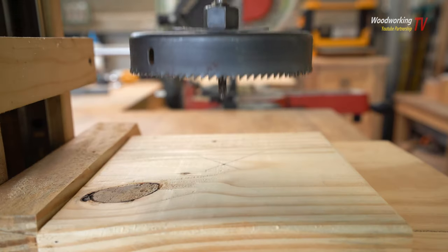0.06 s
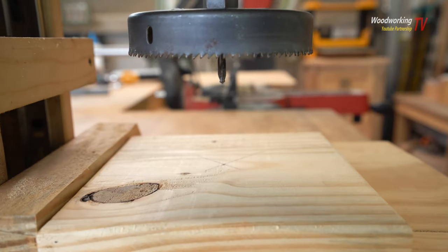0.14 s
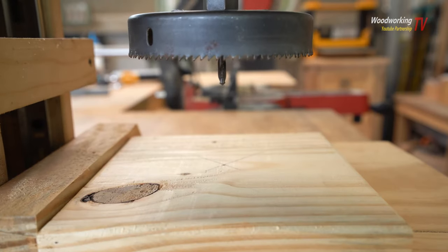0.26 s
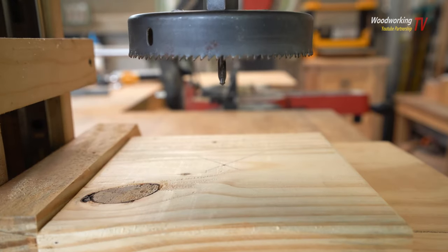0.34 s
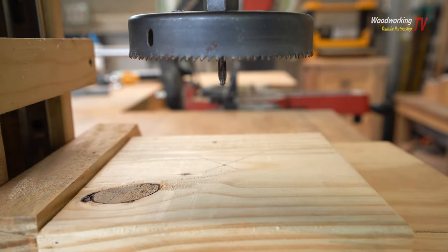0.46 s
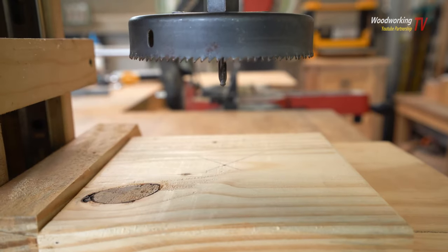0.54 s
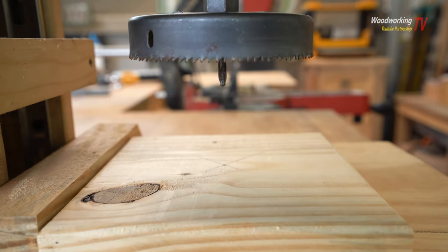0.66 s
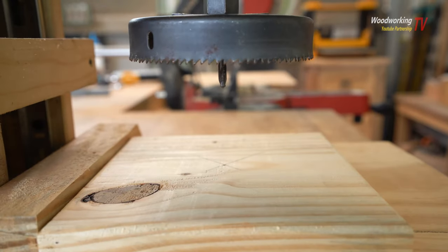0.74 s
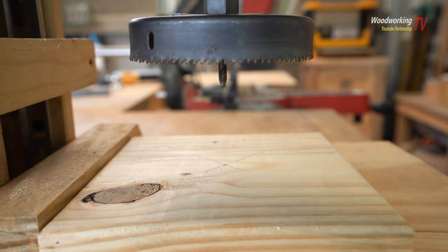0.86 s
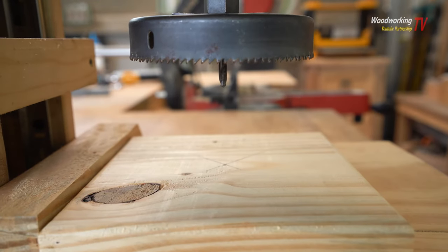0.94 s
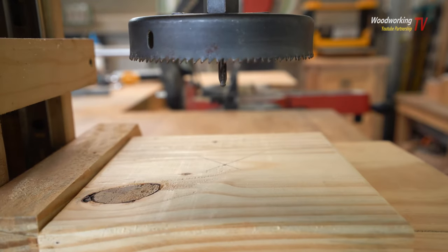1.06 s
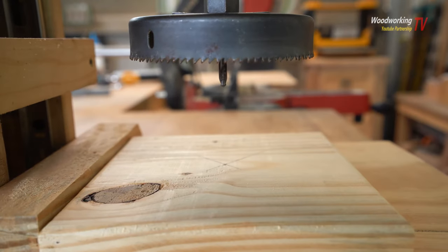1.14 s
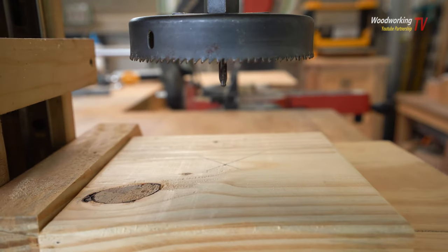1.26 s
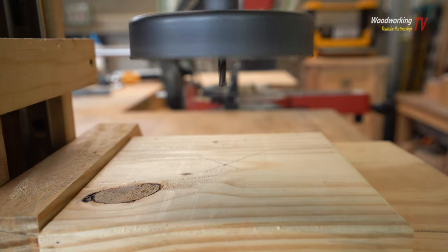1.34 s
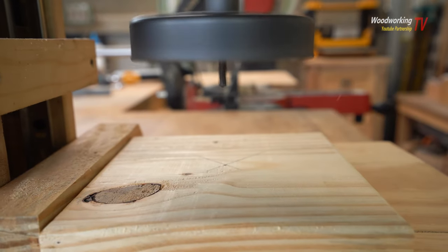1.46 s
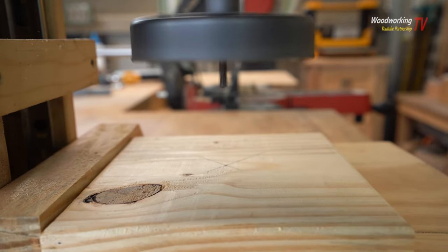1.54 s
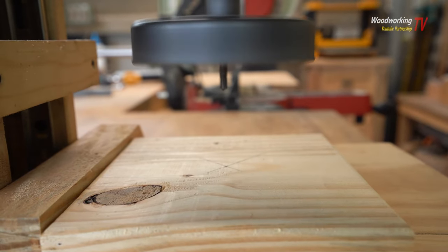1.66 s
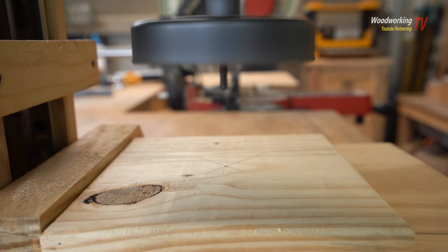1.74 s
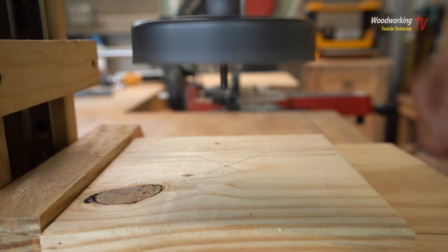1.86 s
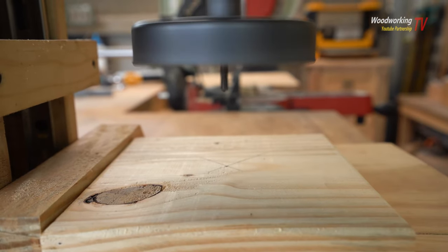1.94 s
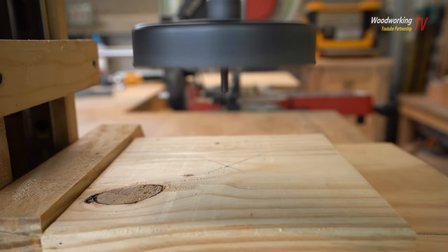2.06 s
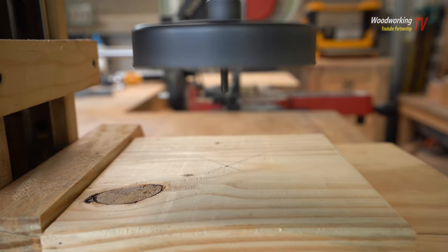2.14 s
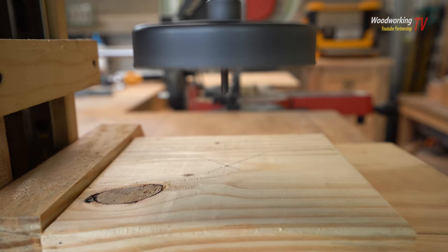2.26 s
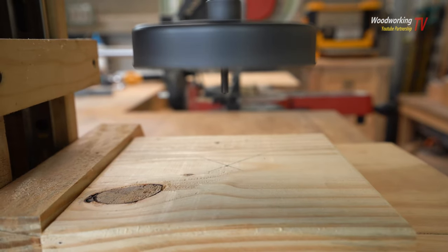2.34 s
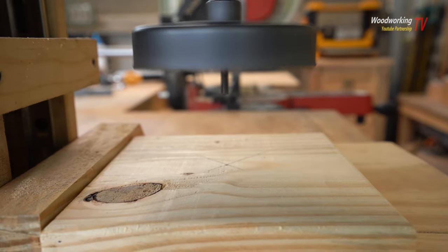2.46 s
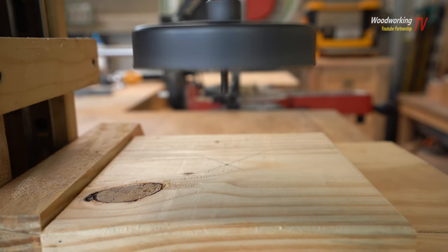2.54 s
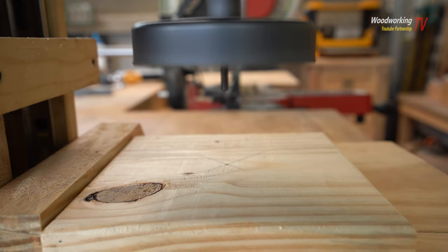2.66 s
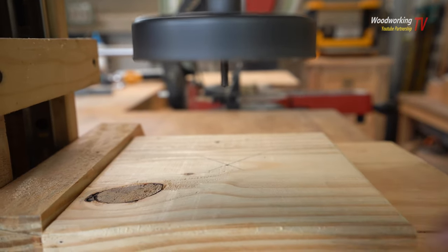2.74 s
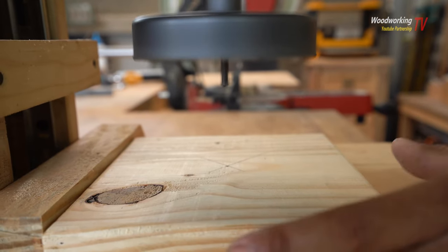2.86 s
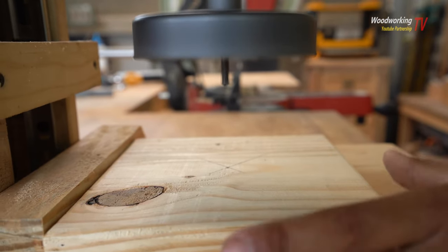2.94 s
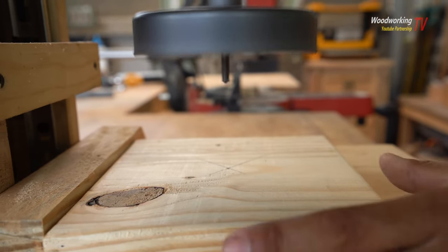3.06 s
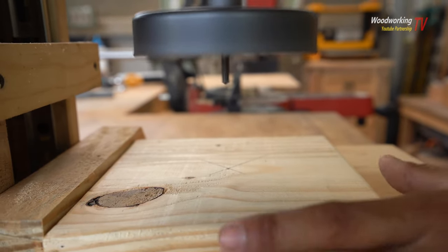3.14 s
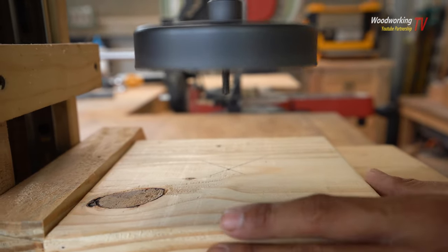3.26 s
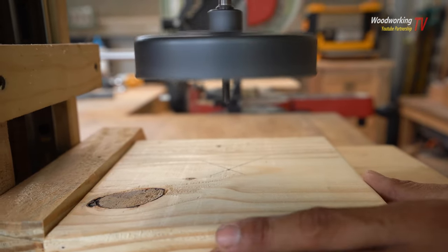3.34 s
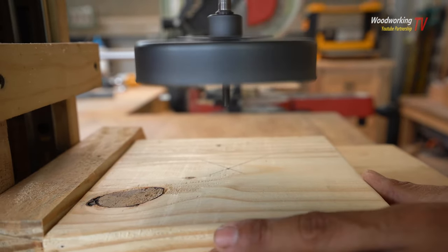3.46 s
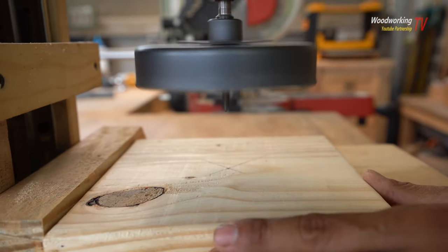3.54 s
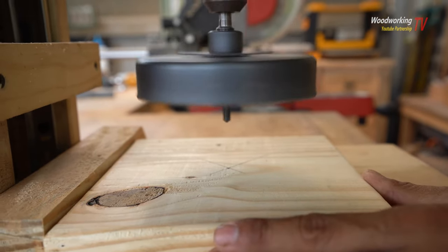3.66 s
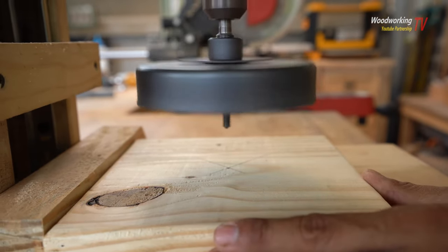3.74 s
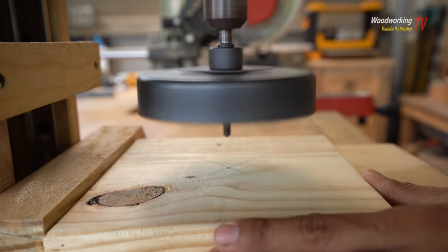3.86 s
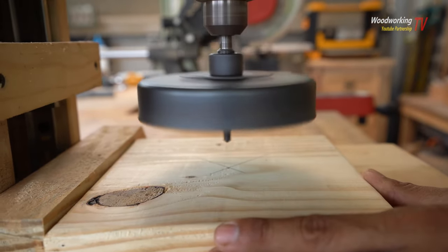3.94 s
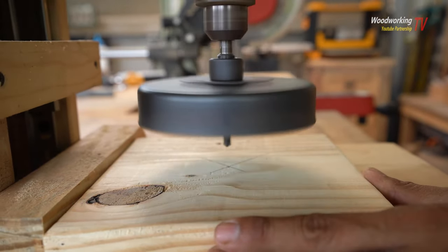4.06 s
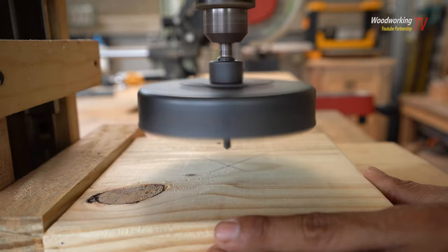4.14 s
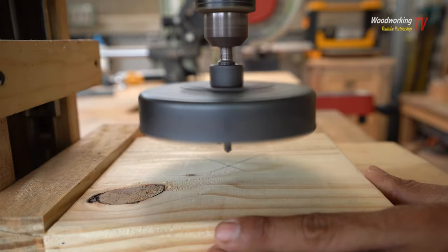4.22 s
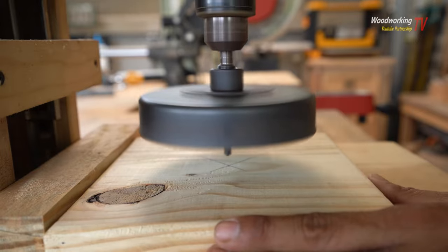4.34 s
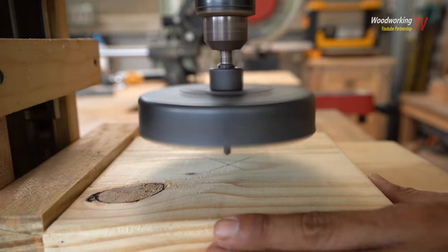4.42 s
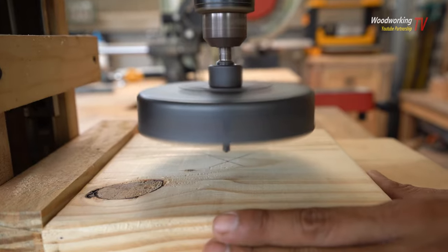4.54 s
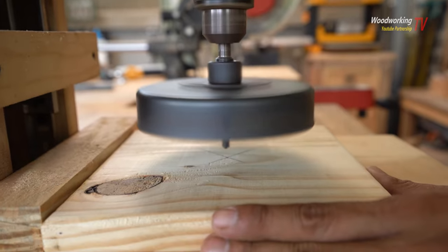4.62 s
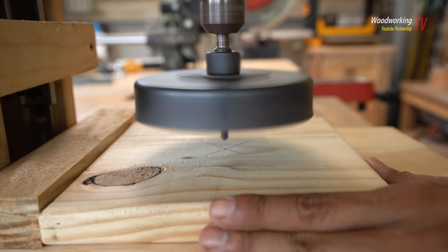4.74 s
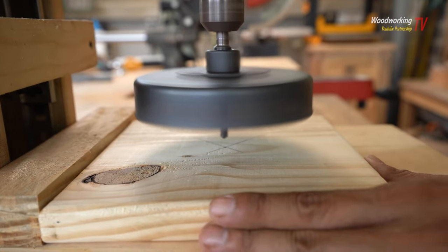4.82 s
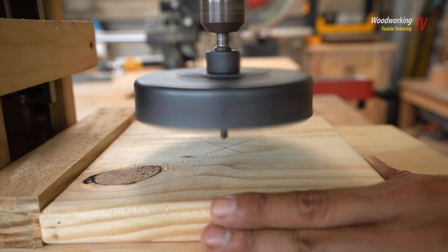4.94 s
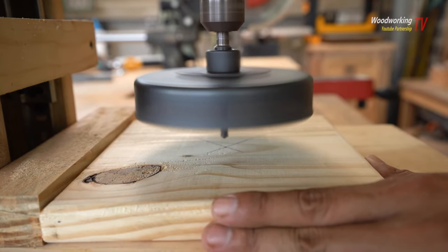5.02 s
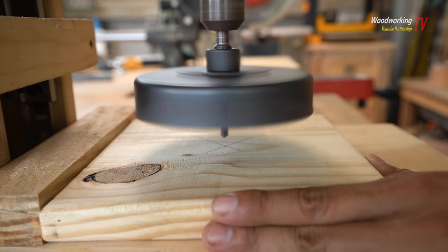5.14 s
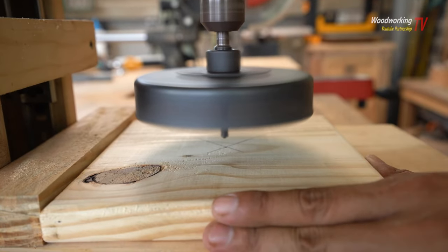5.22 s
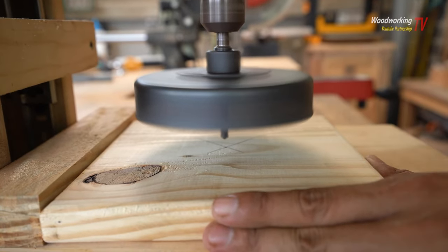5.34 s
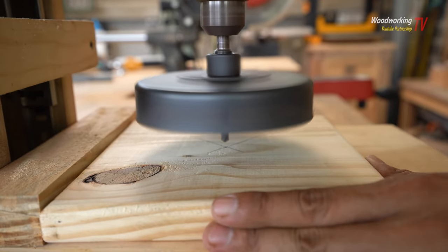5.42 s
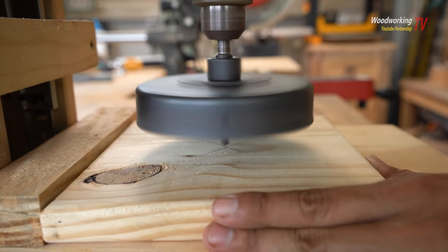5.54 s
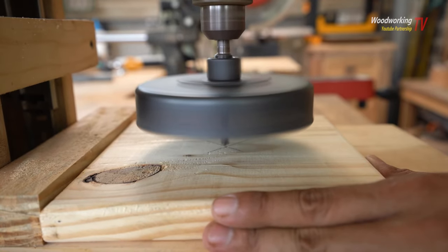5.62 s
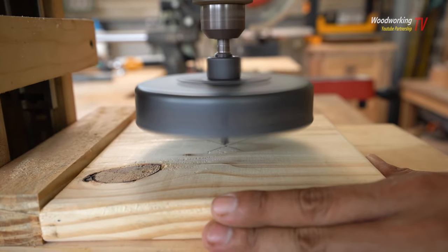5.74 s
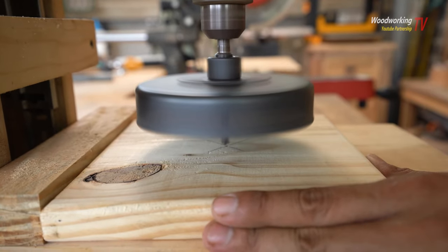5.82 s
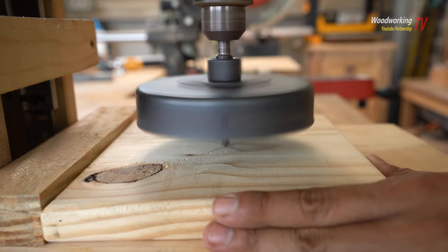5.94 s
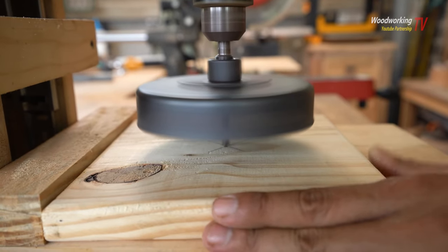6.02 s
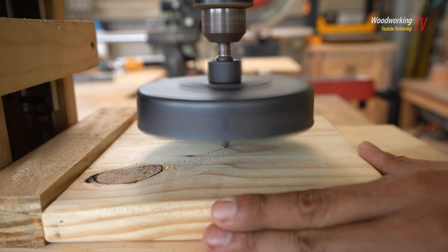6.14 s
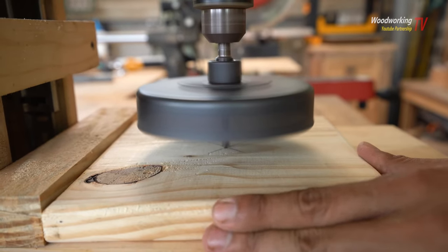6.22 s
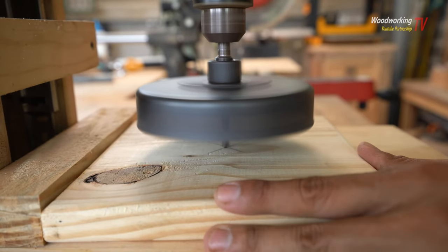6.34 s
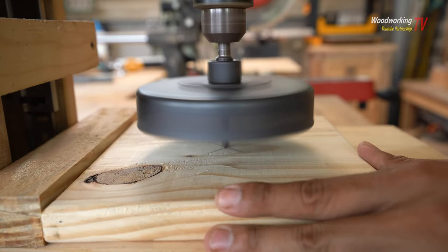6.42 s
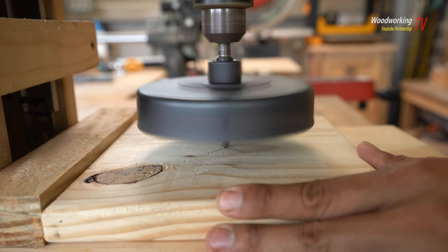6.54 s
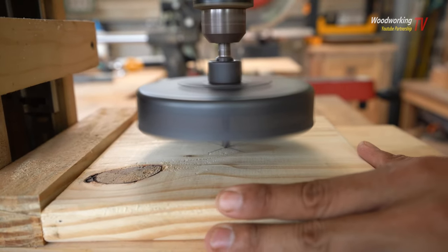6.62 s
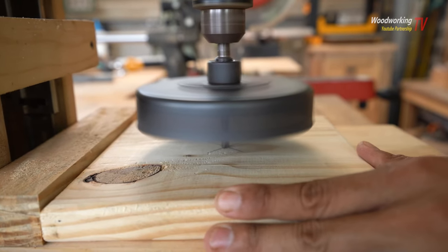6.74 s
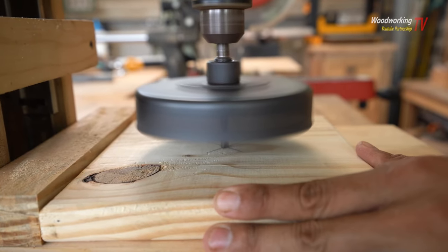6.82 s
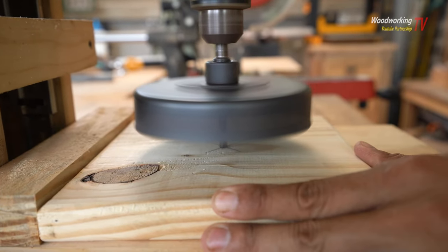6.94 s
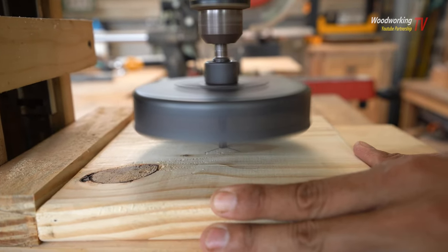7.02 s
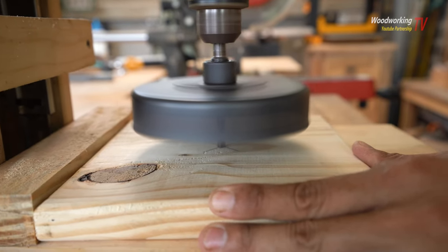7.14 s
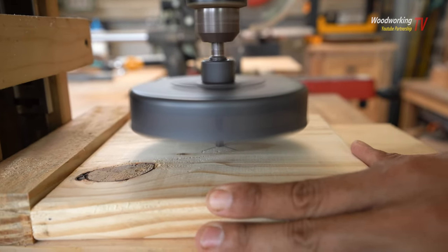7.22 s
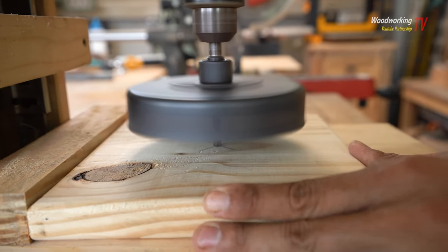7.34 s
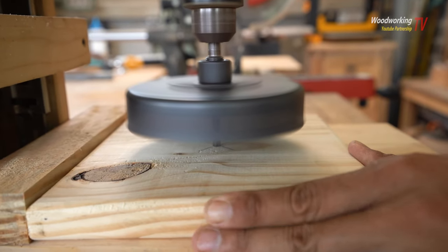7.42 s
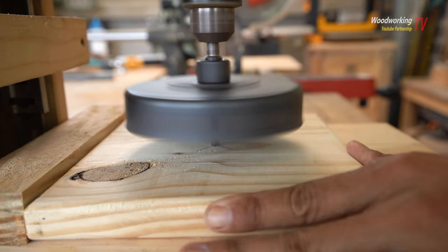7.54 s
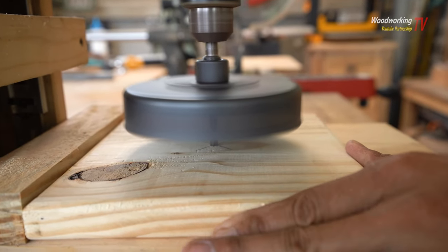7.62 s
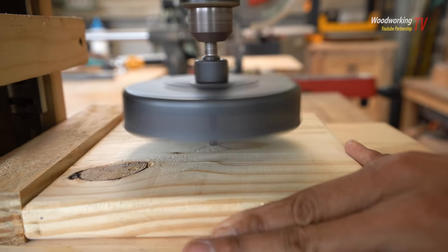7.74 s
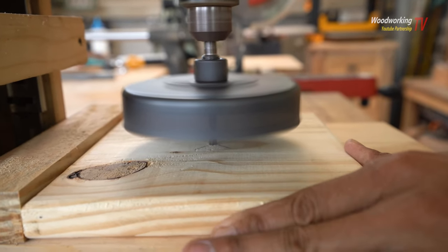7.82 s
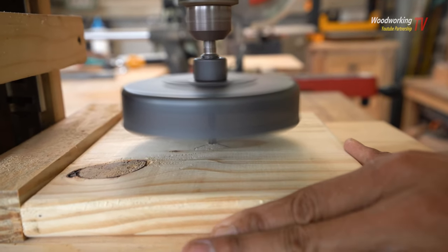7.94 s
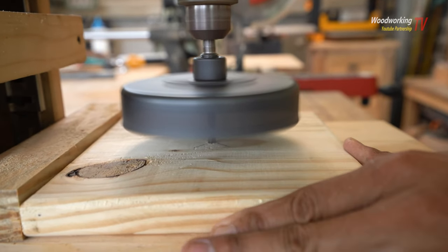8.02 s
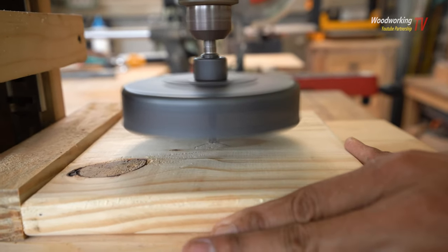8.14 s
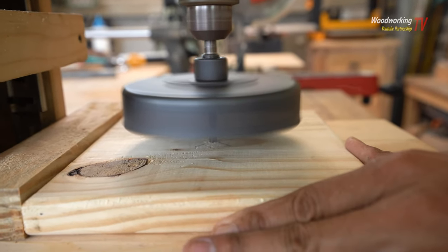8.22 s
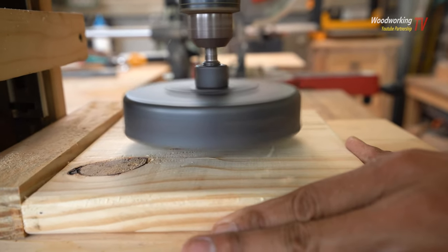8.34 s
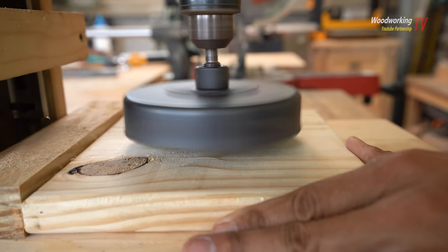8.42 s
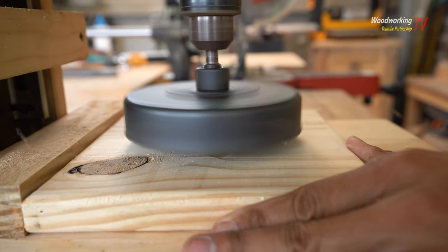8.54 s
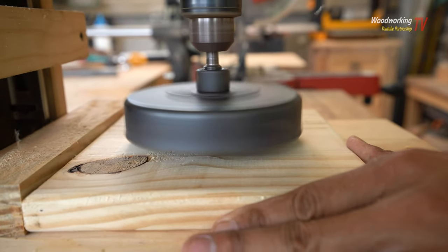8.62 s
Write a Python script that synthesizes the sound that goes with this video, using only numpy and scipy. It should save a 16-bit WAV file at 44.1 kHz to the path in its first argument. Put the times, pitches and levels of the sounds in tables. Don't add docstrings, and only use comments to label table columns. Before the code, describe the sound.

A lever clacks in a humming workshop, then a geared electric drill whines up, rattles loosely, and bores into wood with growling, straining, dropping pitch.

```python
import sys
import numpy as np
from scipy import signal
from scipy.fft import rfft, irfft, next_fast_len
from scipy.io import wavfile
from scipy.ndimage import map_coordinates

SR = 44100
rng = np.random.default_rng(int(sys.argv[2]) if len(sys.argv) > 2 else 0)


def store_wav(level_fs):
    pcm = np.round(np.clip(np.atleast_2d(level_fs), -1, 1) * 32767)
    wavfile.write(sys.argv[1], SR, pcm.T.astype(np.int16))


def gain_from_db(level_db):
    decades = np.asarray(level_db, float) / 20
    return 10 ** decades


N = 382347
TIME = np.arange(N) / SR

GEAR = 9.27
MESH, SLOTS, BARS = 4, 7, 12
TRIGGER_S, CONTACT_S = 1.335, 6.6
SEAT_S = 0.18
LOWERED_S = (3.67, 4.7)

# t/s, thump level/dB
TOUCH = [
    (5.98, -82),
    (6.03, -47),
    (6.08, -59),
    (6.3, -64),
    (6.6, -66),
]
# t/s, length/s, octave level/dB, steady share/1
SQUEALS = [
    (7.32, .14, -24.5, .6),
    (8.115, .17, -26, .2),
]


def unit(x):
    return x / np.sqrt(np.mean(x ** 2) + 1e-20)


def along(points, hz):
    f, v = np.transpose(points)
    return np.interp(np.log(hz + 1), np.log(f + 1), v)


def curves(rows):
    s, *cols = np.transpose(rows)
    return [np.interp(TIME, s, c) for c in cols]


def ramp(start_s, length_s):
    return np.clip((TIME - start_s) / length_s, 0, 1)


def bump(s, width_s):
    return np.exp(-((TIME - s) / width_s) ** 2)


def wobble(rate):
    return map_coordinates(rng.standard_normal(int(N * rate / SR) + 4), [TIME * rate])


def filtered(x, response):
    m = next_fast_len(N + SR // 2)
    return irfft(rfft(x, m) * response(np.fft.rfftfreq(m, 1 / SR)), m)[..., :N]


def resonant(x, body):
    def response(f):
        return sum((-1) ** k * gain_from_db(db) * 1j * f * w / (c * c - f * f + 1j * f * w)
                   for k, (c, w, db) in enumerate(body))
    return filtered(x, response)


def rush(spectrum):
    # f/Hz, left-right likeness/1
    likeness = [(300, 0.99), (700, 0.92), (1500, 0.97), (3000, 0.94), (6000, 0.59), (15000, 0.73)]

    def response(hz):
        turn = np.arccos(np.clip(along(likeness, hz), -1, 1)) / 2
        return gain_from_db(along(spectrum, hz)) * [np.cos(turn), np.sin(turn)]
    mid, side = filtered(rng.standard_normal((2, N)), response)
    return unit(np.array([mid + side, mid - side]))


def tone(turns, db, flutter_db, rate=25):
    return np.sqrt(2) * gain_from_db(db + flutter_db * wobble(rate)) * np.sin(2 * np.pi * turns)


def once_a_turn(spindle, sharp, slack_db):
    size = np.clip(rng.standard_normal(N // 100), -3, 1.6)[spindle.astype(int)]
    swell = unit(abs(np.sin(np.pi * spindle)) ** (2 * sharp))
    return swell * gain_from_db(slack_db * size - slack_db ** 2 / 9)


def speed():
    # t/s, rotor f/Hz
    pull = [(1.33, 900), (1.41, 856), (1.46, 866), (1.54, 927), (1.66, 933), (3.15, 934), (3.94, 931),
            (5.27, 924.5), (6.4, 917.5), (6.66, 911), (7.02, 907), (7.28, 891), (7.41, 895), (7.8, 884),
            (8.07, 889), (8.26, 877), (8.37, 848), (8.67, 800)]
    free_hz, behind_hz, behind_at_s, catch_up_s = 934, 320, 1.54, .3
    lag_hz = behind_hz * np.exp(-(np.maximum(TIME, TRIGGER_S) - behind_at_s) / catch_up_s)
    hz = curves(pull)[0] - lag_hz
    return hz, np.clip(1 - hz / free_hz, 0, 1)


def shafts():
    # f/Hz, rms level/dB
    rotor_tone = [(255, -67), (600, -62), (765, -48.5), (850, -49), (874, -41), (920, -36)]
    slot_tone = [(1800, -40), (2500, -38), (3200, -32), (3700, -26), (4200, -29), (4650, -33), (5600, -34),
                 (6100, -47)]
    bar_tone = [(3060, -53), (3600, -22.5), (4350, -19), (5600, -26.5), (6200, -40), (7250, -52),
                (8400, -30.5), (10300, -48)]
    passing = [(3.98, 0.39, 2.1), (5.5, 0.078, 2.1)]
    nearer_db, graze_damp_db = 3.5, -2
    damped_db = (-46, -52, -50)
    hz, held = speed()[0], ramp(CONTACT_S, 0.11)
    rotor_db = along(rotor_tone, hz) + nearer_db * ramp(LOWERED_S[0], 0.27)
    rotor_db = rotor_db + graze_damp_db * ramp(TOUCH[0][0], 0.082)
    rotor_db = rotor_db + sum(db * bump(s, width) for s, width, db in passing) + 0.81 * wobble(2.85)
    slot_db = along(slot_tone, SLOTS * hz) + 1.3 * wobble(3)
    bar_db = along(bar_tone, BARS * hz) + 2.4 * wobble(2.6)
    free = (rotor_db, slot_db, bar_db)
    levels = [(1 - held) * db + held * damped for db, damped in zip(free, damped_db)]
    return np.cumsum(hz * (1 + 0.00087 * wobble(30))) / SR, levels


def airflow():
    housing_idle_db, brush_idle_db, fan_idle_db, vent_idle_db = -32.5, -27.5, -21.5, -34
    inrush_db, inrush_s = 15, 0.073
    spark_db = 5.5
    fan_full_hz, fan_power = 764, 1.4
    (hz, torque), since = speed(), np.maximum(TIME - TRIGGER_S, 0)
    free_torque = torque * (TIME < CONTACT_S)
    rise_db = 20 * np.log10(1 - np.exp(-since / 0.013) + .03)
    choke_db = -33 * torque * ramp(CONTACT_S, SEAT_S) - 1.4 * ramp(CONTACT_S, 0.47)
    fan_db = 20 * fan_power * np.log10(np.clip(hz / fan_full_hz, .1, 1)) + choke_db + rise_db
    housing_db = housing_idle_db + inrush_db * np.exp(-since / inrush_s) + rise_db
    brush_db = brush_idle_db + spark_db * free_torque + rise_db / 2
    nearer_db = 6.5 * ramp(LOWERED_S[1] - .5, .5)
    vent_db = vent_idle_db - 60 * free_torque + nearer_db + choke_db
    return housing_db, brush_db, fan_idle_db + fan_db, vent_db


def motor(rotor, levels):
    whine = [(2, -47), (3, -41.5), (5, -43), (9, -41), (13, -46), (14, -47), (15, -59)]
    # f/Hz, level/dB per Hz
    housing = [(59, -78), (100, -74), (813, -20), (852, -18.5), (921, -9), (966, -14.5), (1030, -5.5),
               (1110, -25), (1200, -6), (1720, -11.5), (1860, -7), (2510, 0.5), (3170, -5.5), (3760, 2),
               (4200, -30), (5460, -44), (9240, -120)]
    brush = [(2350, -32.5), (4000, -1), (4220, -4), (4750, -3), (6020, -7), (6990, -3.5), (7620, -8.5),
             (8280, -4.5), (9800, -4.5), (12700, -14), (21600, -120)]
    fan = [(5290, -35), (9000, -4), (10500, -8.5), (11400, 0), (12300, 1), (13300, -1), (14400, 2),
           (15300, -3.5), (15800, -2.5)]
    # f/Hz, width/Hz, level/dB
    vent_body = [(13300, 750, 0), (12050, 400, -6)]
    beat_hz, beat_db = 199, -50

    def smear(steady):
        return steady + wobble(500)

    def throb(depth):
        spindle_part = 0.11 * np.sin(2 * np.pi * rotor / GEAR)
        return 1 + depth * np.sin(2 * np.pi * rotor) + spindle_part

    rotor_db, slot_db, bar_db = levels
    lines = tone(rotor, rotor_db, 0.42)
    lines = lines + smear(0.3) * tone(SLOTS * rotor, slot_db, 4.6)
    lines = lines + smear(0.76) * tone(BARS * rotor, bar_db, 1.5)
    settled = np.interp(TIME, (1.6, 2.1, 6.6, 7.2), (0, 1, 1, .5))
    lines = lines + settled * sum(tone(k * rotor, db, flutter_db=1.5) for k, db in whine)
    lines = lines + np.sqrt(settled) * tone(rotor + beat_hz * TIME, beat_db, flutter_db=2.0)
    *air_db, vent_db = airflow()
    noise = 0
    for db, spectrum, depth in zip(air_db, (housing, brush, fan), (.15, .3, .3)):
        level = gain_from_db(db + 1.25 + 0.57 * wobble(12) + 0.88 * wobble(90))
        noise = noise + level * throb(depth) * rush(spectrum)
    whistle = unit(resonant(resonant(rush(fan), vent_body), vent_body))
    return lines, noise + gain_from_db(vent_db + 1.3 * wobble(41)) * whistle


def squeal(column):
    return sum(value * ramp(s, .025) * (1 - ramp(s + length, .025))
               for (s, length, *_), value in zip(SQUEALS, column))


def meshing():
    # f/Hz, rms level/dB
    mesh_tone = [(1020, -28), (1710, -35), (2120, -24.5), (2500, -19.5), (2960, -23.5), (3320, -23),
                 (3500, -26), (3640, -40)]
    loaded_mesh_db, octave_db, loaded_octave_db = -23, -38.5, -33
    strain_db = 42
    free_slack_db, loaded_slack_db = 12, 4
    surge_db, surge_s = 7, 0.06
    (hz, torque), load = speed(), ramp(CONTACT_S - .1, SEAT_S)
    surge = sum(surge_db * (TIME > s + length) * np.exp(-abs(TIME - s - length) / surge_s)
                for s, length, *_ in SQUEALS)
    strained_db = loaded_mesh_db - 2.5 + strain_db * torque + .5 * wobble(7.2)
    mesh_db = (1 - load) * along(mesh_tone, MESH * hz) + load * strained_db
    mesh_db = mesh_db + surge - squeal((.5, 3.5))
    double_db = (1 - load) * (octave_db - 35 * torque) + load * loaded_octave_db - surge
    double_db = double_db + squeal([row[2] - loaded_octave_db for row in SQUEALS])
    most = (1 - load) * (.22 + 0.51 * torque) + load * .7
    steady = np.clip(12 * (torque - .036), .1, most)
    steady = np.maximum(steady, squeal([row[3] for row in SQUEALS]))
    slack_db = free_slack_db + load * (loaded_slack_db - free_slack_db)
    return mesh_db, double_db, slack_db * (1 - load * steady) - squeal((2, 2)), steady


def backlash(spindle):
    # t/s, peak level/dB
    hard_knocks = [(2.153, -13), (2.2127, -14.5), (2.345, -15), (2.7477, -15), (2.7913, -12),
                   (2.862, -13.5), (3.057, -13.5), (3.203, -12), (3.307, -13), (3.5012, -12), (3.6305, -13),
                   (4.0092, -12.5), (4.2077, -13.5), (4.546, -12.5), (4.5775, -11), (4.677, -13.5),
                   (5.2441, -13.5), (5.468, -16), (5.9983, -12), (6.0976, -11), (6.1887, -11),
                   (6.2497, -12), (6.3101, -14), (6.4841, -11.5)]
    flight_turns = (3, 3, 4, 4, 4, 5, 5, 6)
    from_s, until_s, knock_db, spread_db = 2.07, 6.62, -15, 2
    draw = rng.random((400, 2))
    hurried = np.cumsum(np.gradient(spindle) * (1 + 22 * speed()[1]))
    flights = np.take(flight_turns, (draw[:, 0] * len(flight_turns)).astype(int))
    turns = np.interp(from_s, TIME, hurried) + np.cumsum(flights)
    turns = np.round(np.interp(turns, hurried, spindle)) + .5
    s = np.interp(turns, spindle, TIME)
    db = knock_db + spread_db * np.sqrt(12) * (draw[:, 1] - .5)
    hard_s, hard_db = np.transpose(hard_knocks)
    loose = (s < until_s) & (abs(s[:, None] - hard_s).min(axis=1) > .018)
    blows = np.zeros(N)
    blows[(np.r_[s[loose], hard_s] * SR).astype(int)] = gain_from_db(np.r_[db[loose], hard_db])
    return blows


def gears(rotor):
    # f/Hz, width/Hz, level/dB
    cup = [(3866, 14, 0), (2600, 60, -8)]
    case = [(3640, 1700, -6.5), (4100, 450, -19)]
    # t/s, level/dB
    cup_ring = [(1.4, -4), (2.2, 17), (3.3, 6), (4.3, 0), (5, -6), (6.5, -10), (8.67, -6)]
    mesh_db, double_db, slack_db, steady = meshing()
    steady, spindle = np.clip(steady, 0, 1), rotor / GEAR
    slack_db = np.clip(np.minimum(slack_db, -(double_db + 20) / 2.5), 1, 4.5)
    loaded = np.clip((TIME - 6.5) / .2, 0, 1)

    def loose():
        return abs(spindle + .03 * slack_db * wobble(70))

    pulled = 1.2 * np.cumsum(loaded * np.gradient(spindle))
    raps = (1 - steady) * once_a_turn(loose(), 10, slack_db)
    raps = raps * tone(MESH * rotor + pulled, mesh_db, flutter_db=1, rate=60)
    bound = np.cumsum(squeal((1, 0)) * np.gradient(spindle))
    mesh = raps + steady * tone(MESH * rotor + bound, mesh_db, flutter_db=2, rate=90)
    oval = steady * once_a_turn(2 * spindle, 3, 2)
    oval = oval * tone(MESH * rotor + 4 * spindle, mesh_db - 2.5, flutter_db=3, rate=90)
    even = sum(tone(k * MESH * rotor, double_db + db, flutter_db=1.6, rate=42)
               for k, db in ((2, -1.5), (4, -10)))
    chatter = (loaded * slack_db + squeal((4, 2))) * wobble(1400)
    chatter = chatter * tone(2.9 * MESH * rotor, -43, flutter_db=1.5)
    burst = np.exp(-((np.arange(200) / SR - .002) / .0014) ** 2)
    knocks = signal.fftconvolve(backlash(spindle), burst)[:N]
    knocks = knocks * np.sin(2 * np.pi * (MESH * rotor + 0.26 * wobble(60)))
    ring = resonant(gain_from_db(curves(cup_ring)[0]) * (knocks + 0.29 * mesh), cup)
    teeth = .8 * (mesh + oval) + .5 * resonant(mesh + oval, case)
    grind = gain_from_db(-23 + 3.4 * loaded + 2.4 * wobble(60)) * speed()[1] ** 0.7
    grind = grind * unit(resonant(rng.standard_normal(N), case))
    third = loaded * steady * (.3 + wobble(700)) * tone(3 * MESH * rotor, -34, flutter_db=2)
    blur = (1 - loaded) * 2 * steady * wobble(450) * tone(MESH * rotor, mesh_db - 6, flutter_db=2)
    overtones = once_a_turn(loose(), 9, slack_db) * (even + chatter)
    return teeth + grind + third + blur + overtones + knocks + ring


def bit(rotor):
    # spindle order/1, level/dB
    bit_orders = [(1, -29.5), (2, -20), (3, -15.5), (4, -18.5), (5, -17.5), (6, -17.5), (7, -26), (8, -8.5),
                  (9, -4), (10, 2), (11, 1), (12, -3.5), (13, 1.5), (14, -5.5), (15, -3), (16, -4.5),
                  (17, -11)]
    # f/Hz, width/Hz, level/dB
    board = [(300, 1100, -5.5), (1038, 143, -2.5), (1290, 390, -0.5), (1505, 53, 1.5)]
    # t/s, scrape level/dB
    bite = [
        (6.64, -39.5),
        (6.9, -40.5),
        (7.02, -35.5),
        (7.17, -41),
        (7.28, -35.5),
        (7.6, -38.5),
        (7.85, -34.5),
        (8.37, -37),
        (8.46, -43.5),
    ]
    deeper_db = 1.8
    spindle, bite_db = rotor / GEAR, curves(bite)[0]
    boring = ramp(CONTACT_S, 0.061)
    bored_db = -49.5 + 1 * (TIME - CONTACT_S) + .15 * (bite_db - np.mean(bite, axis=0)[1]) + wobble(9)
    thump_db = (1 - boring) * curves(TOUCH)[0] + boring * bored_db

    def stack(orders):
        return unit(sum(tone(k * spindle + rng.random(), db, flutter_db=3.5, rate=7) for k, db in orders))

    chips = once_a_turn(spindle, 1.0, 3.1) * rng.standard_normal(N)
    thump = stack(bit_orders[:7]) + 0.15 * unit(resonant(chips, board[:1]))
    depth = ramp(CONTACT_S + .7, .3) - .5
    scrape = stack([(k, db + deeper_db * depth * (12 - k)) for k, db in bit_orders[7:]])
    low_chips = (1 + 1.06 * depth) * unit(resonant(chips, board[1:2]))
    high_chips = (1 - depth) * unit(resonant(chips, board[2:]))
    scrape = scrape + 0.45 * (low_chips + high_chips)
    scrape_db = bite_db + 0.5 - 6 * squeal((1, .2))
    return gain_from_db(thump_db) * thump + boring * gain_from_db(scrape_db) * scrape


def stand():
    # t/s, peak level/dB, pitch f/Hz, rattle level/dB
    clacks = [
        (0.138, -36, 2600, -16),
        (0.159, -35, 3200, -16),
        (0.472, -12, 1770, -11),
        (0.609, -18, 1060, -0.5),
        (0.838, -41, 510, -5),
        (1.112, -38, 1110, -17),
        (1.25, -31.5, 1560, -19),
        (1.27, -28, 1090, -26),
        (1.335, -25, 2470, -9),
    ]
    # f/Hz, width/Hz, level/dB
    frame = [(526, 170, -1.5), (1026, 90, 4), (1500, 73, 3), (1950, 110, 3.5), (2380, 190, 1.5),
             (2630, 150, 0.5), (3400, 640, -9)]
    jolt_db, jolt_t60_s = -23.5, 0.3
    out, t = np.zeros(N + SR), np.arange(SR // 4) / SR
    for s, db, pitch_hz, rattle_db in clacks:
        puff = np.zeros(N)
        puff[:len(t)] = rng.standard_normal(len(t)) * (gain_from_db(-60 * t / 0.065) + 0.41 * gain_from_db(-60 * t / 0.19))
        tuned = [(hz, w, level - 7 * abs(np.log2(hz / pitch_hz))) for hz, w, level in frame]
        ring = resonant(puff, tuned)[:len(t)]
        rattle = np.convolve(rng.standard_normal(len(t)), (.7, 0, -.7), "same")
        rattle = rattle * (gain_from_db(-60 * t / 0.016) + 0.65 * gain_from_db(-60 * t / 0.18))
        clack = ring / abs(ring).max() + gain_from_db(rattle_db - 5.0) * rattle
        out[round(s * SR):][:len(t)] += gain_from_db(db) * clack
    shake = unit(resonant(rng.standard_normal(N), frame)) * (TIME > TRIGGER_S)
    return out[:N] + shake * gain_from_db(jolt_db - 60 * abs(TIME - TRIGGER_S) / jolt_t60_s)


def walls(x):
    # f/Hz, t60/s
    decay = [(200, 0.038), (2000, 0.29), (12000, 0.013)]
    hz, t, z = signal.stft(rng.standard_normal((2, SR // 3)), SR, nperseg=256)
    tail = signal.istft(z * gain_from_db(-60 * t / along(decay, hz)[:, None]), SR, nperseg=256)[1]
    late = np.pad(x, (130, 0))[None]
    return signal.fftconvolve(late, tail / np.linalg.norm(tail[0]), axes=1)[:, :N]


def shop():
    # f/Hz, rms level/dB
    mains = [(199.2, -67), (301.5, -67), (398.4, -69), (495.3, -63), (597.5, -69.5), (1104, -71),
             (1200, -77), (1400, -88), (1620, -67), (1744, -73), (1906, -94), (2196, -72), (2600, -68.5),
             (2799, -86), (2998, -81), (3198, -66.5), (3397, -80), (3596, -70.5), (3924, -92), (3994, -75)]
    # f/Hz, level/dB per Hz
    room = [(15, -107), (25, -79), (97, -11.5), (144, -48), (192, -22.5), (445, -9.5), (494, -6),
            (791, -13), (855, -16.5), (1650, -9), (1920, -13.5), (3250, -16.5), (3800, -19), (13000, -42)]
    # t/s, level/dB
    duck = [(1.33, 9.5), (1.45, 10), (1.8, -16), (8.67, -20)]
    # t/s, width/s, rustle rise/dB, shop rise/dB
    slides = [
        (.16, 0.028, 11, 0),
        (.45, 0.017, 6, 3.5),
        (1.3, 0.04, 0, 3),
    ]
    near = [bump(s, width) for s, width, *_ in slides]
    rustle_db = -57 + 2.8 * wobble(3.2) + sum(g * row[2] for g, row in zip(near, slides))
    noise_db = -50.5 + sum(g * row[3] for g, row in zip(near, slides))
    hum = sum(tone(hz * TIME + rng.random(), db, flutter_db=3.0, rate=40) for hz, db in mains)
    rustle = gain_from_db(rustle_db - 5.5) * rush([(2500, -15), (5000, -1.5), (12000, -8.0), (15800, -11)])
    noise = gain_from_db(noise_db - 3.0 + 0.27 * wobble(32.7)) * rush(room)
    return gain_from_db(curves(duck)[0]) * (hum + rustle + noise)


def scene():
    # f/Hz, left minus right level/dB
    lean = [(60, -1.5), (150, 0.0), (380, 2.5), (950, 0.5), (2380, -1), (5980, -1), (15000, -2.5)]
    rotor, levels = shafts()
    lines, noise = motor(rotor, levels)
    running = np.clip((TIME - 1.331) / 0.0022, 0, 1)
    near = running * gears(rotor) + stand()
    echo = gain_from_db(-12) * walls(near)
    drill = near + echo + running * (lines + bit(rotor) + noise)
    return filtered(drill, lambda hz: gain_from_db(along(lean, hz) / 2 * [[1], [-1]])) + shop()


def low_pass(x):
    return signal.sosfilt(signal.butter(12, 17080, fs=SR, output="sos"), x)


def record(dry):
    low_cut_hz, top_hz = 190, 15800
    mix = filtered(dry, lambda hz: (hz < top_hz) * (1j * hz / (low_cut_hz + 1j * hz)) ** 2)
    return low_pass(mix)


dry = scene()
out = record(dry)
store_wav(out)
```